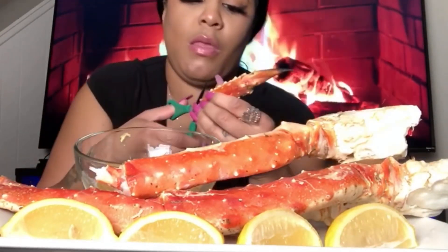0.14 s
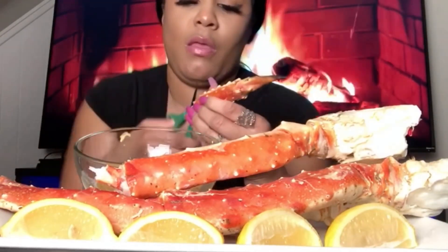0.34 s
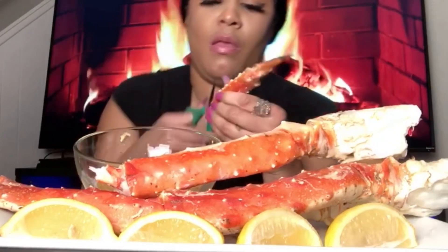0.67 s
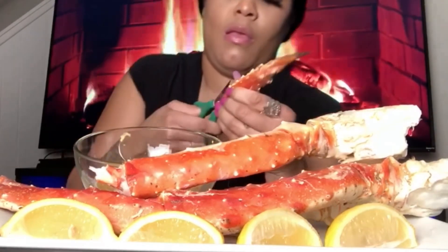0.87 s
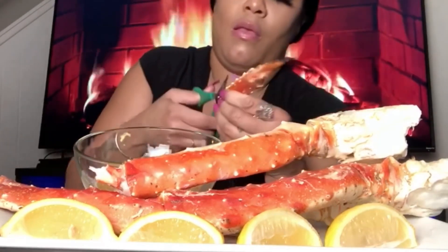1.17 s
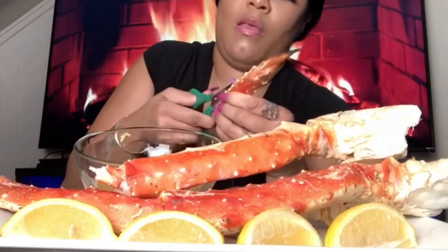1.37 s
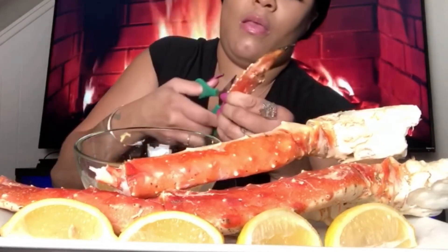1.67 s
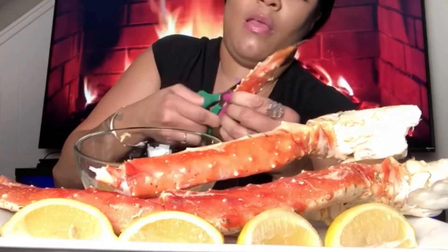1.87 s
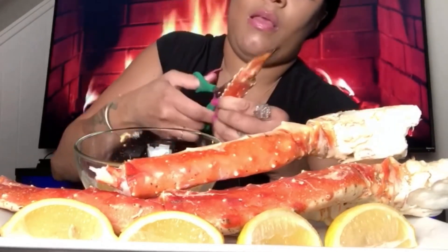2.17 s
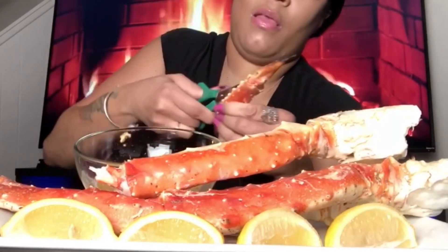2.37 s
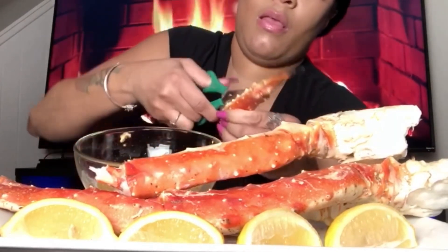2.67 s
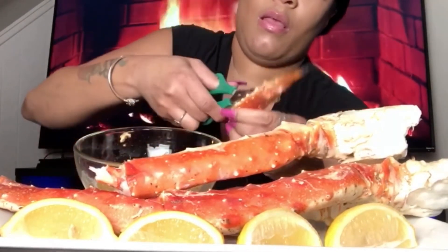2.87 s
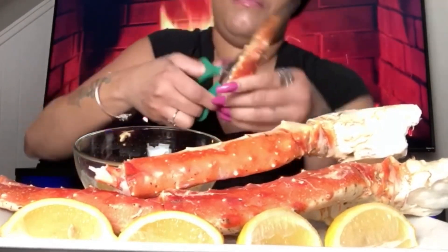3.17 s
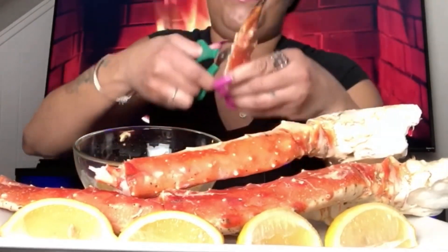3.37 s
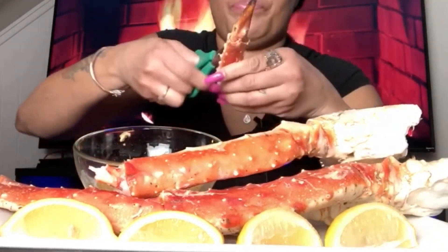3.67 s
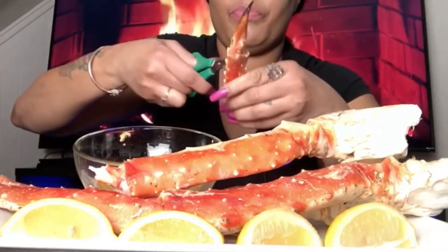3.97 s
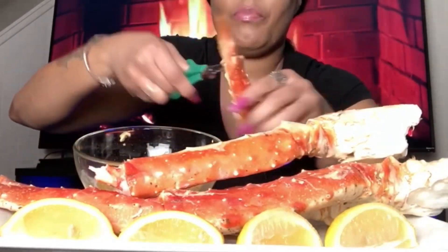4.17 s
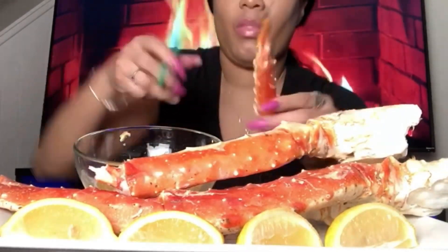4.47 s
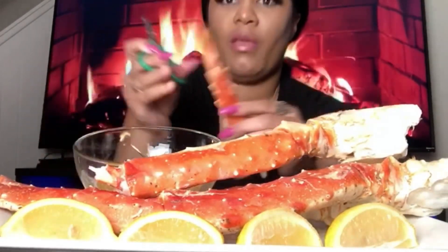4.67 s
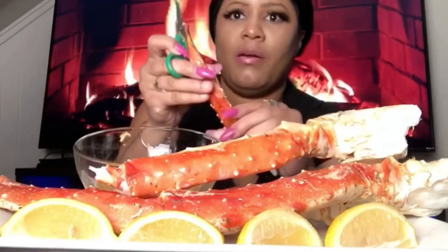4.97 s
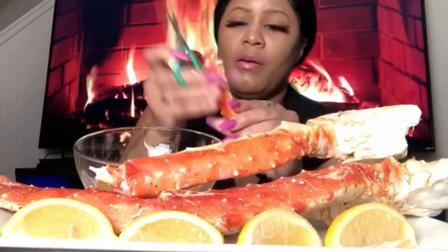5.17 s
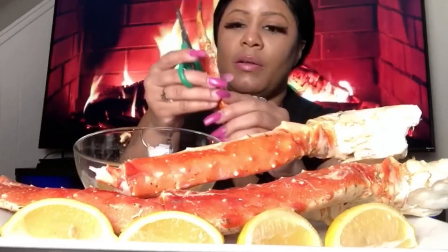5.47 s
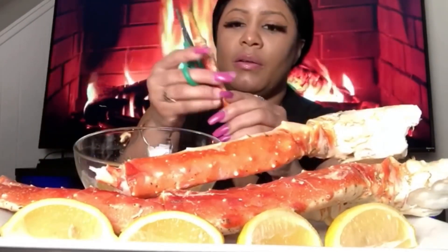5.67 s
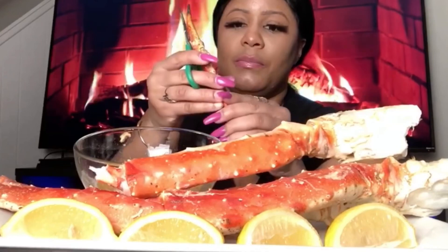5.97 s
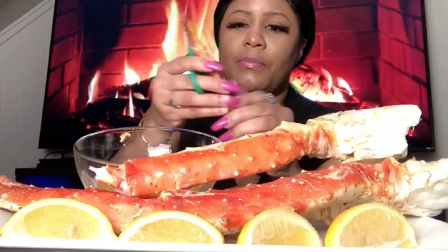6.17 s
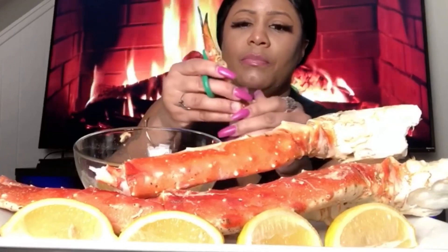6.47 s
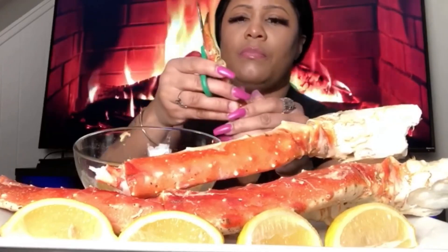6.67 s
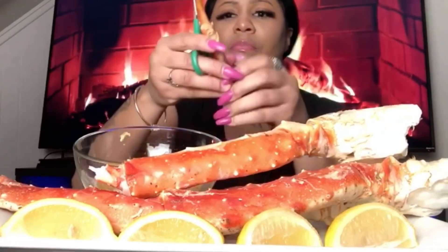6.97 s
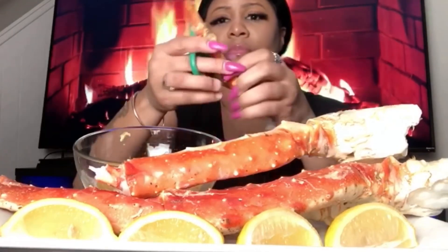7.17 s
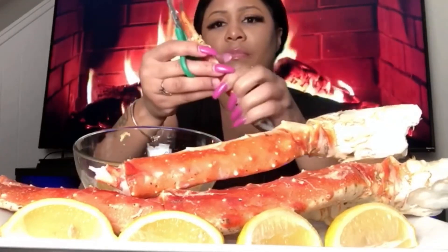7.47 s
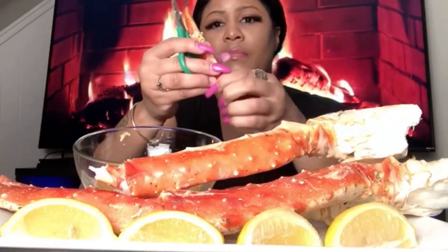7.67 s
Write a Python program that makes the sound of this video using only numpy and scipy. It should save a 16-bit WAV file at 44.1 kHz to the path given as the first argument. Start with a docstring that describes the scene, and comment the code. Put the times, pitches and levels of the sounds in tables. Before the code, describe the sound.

Close to the microphone, kitchen shears bite through a hard crab leg at a table. Brittle cracks come in quick clusters, with fine crackling splinters between, growing loudest around three to four seconds. After a near-quiet lull with soft bumps and a faint squeak, a few more sharp snaps follow. Small furnished room, short reflections, steady light hiss.

```python
"""Kitchen shears bite through a hard crab leg, close to the microphone, over a table in a small furnished room.
Each sharp crack is a noise burst ringing the shell wall and hollow leg, with a spray of treble splinters.
Short splintering runs are clumps of random snaps; echoes and a diffuse tail bring both back from the room.
Arms and elbows make decaying low bumps and dull scuffs on the table, and a narrow squeak comes and goes.
Underneath lie steady room and microphone hiss and, near the end, a wavering low hum."""
import sys
import numpy as np
from scipy import signal
from scipy.fft import rfft, irfft
from scipy.io import wavfile

SR = 44100
rng = np.random.default_rng(int(sys.argv[2]) if len(sys.argv) > 2 else 0)


def wav_record(signal):
    """Record a signal, one row per channel, as 16-bit PCM in the file named by sys.argv[1]."""
    frames = np.transpose(np.atleast_2d(signal))
    bounded = np.clip(frames, -1, 1)
    # unit amplitude maps onto the largest positive 16-bit level
    quanta = np.round(bounded * 32767).astype(np.int16)
    wavfile.write(sys.argv[1], SR, quanta)


N = 345600   # samples

# Shell cracks. Each row: start in seconds, relative strength in dB, then hollow body and
# splinter treble in dB relative to strength, before the common layer gains.
SHELL_CRACKS = [(0.4643, -5, -16, -4), (0.4913, -8.5, -29, -8), (.525, -8, -3, 2.5),
                (0.8422, -32.5, -22, 1.5), (0.8884, -20.5, -25, -4), (0.8962, -16, -31, -30),
                (0.9178, -21, -10, -6), (.939, -13.5, -10.5, -5.5), (1.1359, -26, -17, -16),
                (1.1424, -16.5, -10, -10.5), (1.2604, -30, -20, 2), (1.2877, -11, -11, -8),
                (1.308, -10, -7.5, -9), (1.3211, -11, -13, -17), (1.3293, -21, -6, -14),
                (1.3804, -8.5, -8, -6), (1.4019, -14.5, -25, -6.5), (1.5826, -28, -3, -5.5),
                (1.8114, -11.5, -17, -0.5), (1.8419, -14, 0.5, -4), (1.855, -13, -0.5, -2),
                (1.871, -14, -2, -4), (1.9044, -20, -24, -2.5), (1.922, -28, -16, 2), (2.0586, -27, 0, -5),
                (2.0703, -24, -1, -16), (2.0905, -20.5, -2, -20), (2.1133, -32, -7, -4),
                (2.2604, -22, -25, -12), (2.2705, -22, -9, 9.5), (2.275, -22, -5, 0), (2.2926, -19, 3, 5),
                (2.3009, -22, 3, 3), (2.3158, -17.5, 8, 3), (2.3411, -10.5, 1, -10.5),
                (2.4869, -25, -1, 5.5), (2.4997, -11.5, -7.5, -7), (2.643, -29, -19, 5),
                (2.6608, -28, -21, -2), (2.668, -22.5, -7, -10), (2.7021, -3, -14, 1),
                (2.7503, 1.5, -13.5, -2), (2.7665, -6, -17, -5), (2.7784, 3, -11, 1.5),
                (2.9699, -4.5, -19, -11.5), (3.0538, -22, -9, -15), (3.4065, -26, -17, -23),
                (3.4488, -20, -8, -17), (3.4539, -17.5, -22, -19), (3.484, -3.5, -9, -14.5),
                (3.5163, 3.5, -16, -7), (3.5392, -1, -1.5, -10.5), (3.7518, -26, -1.5, -4),
                (3.767, -21, -19, -14), (3.7781, -5.5, -30, -2.5), (3.845, -28, -20, -13),
                (3.8543, 5, -15, -15), (3.9806, -3, -14.5, -23), (4.0291, -7, -19, -6),
                (4.126, -4, -16.5, -6), (4.1549, -3, -8.5, -12.5), (4.184, -16.5, -6, -2.5),
                (4.2129, -12.5, -11, -2.5), (4.3264, -30.5, 0, -4), (4.7046, -34.5, 5, 5),
                (5.3113, -31.5, -9, -17), (6.0243, -21, -17, -30.5), (6.0829, -29.5, -6, -1.5),
                (6.2116, -3, -17, -27), (6.2166, -11, -7.5, -3.5), (6.2263, -20, -16, 2),
                (6.3316, -26.5, -7, -11), (6.438, -3.5, -9.5, 4.5), (6.4426, 0, -24, -16),
                (6.499, -10, -19, -2), (6.6633, -32.5, -13, 5.5), (6.926, -28.5, -7, -18),
                (6.9758, -15.5, -21, 2), (7.1968, -24.5, -25, -2)]
# The shell wall where it breaks, as the cut moves along the leg. Each row: time in seconds, pitch in Hz,
# ring width in Hz, typical tearing time in ms, finest treble in dB relative before its common gain.
WALL_ALONG_CUT = [(.46, 1850, 450, 0.59, 1), (.492, 2160, 300, 0.58, -4), (.9, 2200, 300, 0.76, -4.5),
                  (1.4, 2250, 249, 0.86, -5), (1.82, 2300, 350, 1.22, -7), (2.3, 2150, 400, .9, 0),
                  (2.5, 2330, 350, .9, -11.5), (2.76, 2260, 550, 0.58, -8), (3.0, 2330, 350, .9, -14),
                  (3.5, 2090, 483, 0.56, -2), (3.77, 2540, 550, 0.43, -5.5), (3.978, 2510, 550, 0.47, -32),
                  (4.03, 2580, 600, 1.17, -24), (4.15, 2530, 534, 0.36, -7), (6.201, 2440, 550, 0.8, -1.5),
                  (6.44, 2470, 550, 0.29, -4), (6.499, 2860, 604, 0.63, -8), (6.98, 2650, 500, 0.28, -38),
                  (7.2, 2330, 400, .3, -9)]
# Weaker modes of the wall. Each row: ratio to wall pitch, width in Hz, gain in dB.
WALL_SIDE_MODES = [(1.238, 380, -10.5), (0.71, 550, -16.5), (0.572, 250, -19.5)]
# Cavity of the leg. Each row: resonance in Hz, width in Hz, relative level in dB.
LEG_CAVITY = [(750, 99, 11), (1020, 78, 10), (1303, 260, 12.5)]
# Colour of the splinters in a crack. Each row: frequency in Hz, relative level in dB per Hz.
SPLINTER_SPECTRUM = [(1800, -31.5), (3000, -5.5), (4000, -9), (5000, -5.5), (6200, -5.5), (7400, 0.5),
                     (8200, -13.5), (9900, -2.5), (12000, -12), (15000, -8.5), (16800, -40)]
# Fine splintering while the blades press. Each row: start in seconds, length in seconds, level in dB,
# bass and treble outside the shell band in dB relative to that level.
SPLINTER_RUNS = [(0.454, 0.091, -44.5, 2.5), (0.672, 0.072, -55, 5.5), (0.832, 0.033, -61, 3),
                 (0.863, .16, -50, -1.5), (1.116, 0.058, -57, 2), (1.264, 0.07, -58, 4),
                 (1.573, .082, -55, -2.5), (1.79, 0.037, -59, 2), (1.829, 0.077, -38.5, 3),
                 (1.877, .09, -52, -7), (2.039, 0.099, -51.5, 1.5), (2.274, 0.1, -37, 2),
                 (2.473, 0.047, -39.5, -5.5), (2.633, 0.073, -50, -3.5), (2.74, .03, -43, 3),
                 (3.223, 0.077, -54.5, -8), (3.357, 0.041, -55.5, -3), (3.452, 0.084, -56, -3),
                 (3.497, 0.094, -37, -1), (3.742, 0.15, -58, 0.5), (3.845, 0.024, -33.5, -13),
                 (4.026, 0.02, -34.5, -4.5), (4.143, 0.031, -45, 3), (4.202, 0.071, -50, 3),
                 (4.303, 0.07, -53, -3), (4.784, 0.017, -62, -11.5), (4.875, 0.012, -53.5, -10),
                 (4.945, 0.048, -53, -6), (5.341, 0.02, -54, -14), (5.511, 0.056, -57, -21),
                 (5.767, 0.015, -56, -16), (6.003, 0.069, -55, -7), (6.206, 0.095, -47.5, 2),
                 (6.436, 0.055, -33.5, -6.5), (6.661, 0.032, -49.5, -2), (6.836, 0.13, -61, -6),
                 (6.967, 0.17, -57.5, -9), (7.11, .05, -63, -15), (7.206, 0.14, -58.5, -12)]
# Colour of the fine snaps. Each row: frequency in Hz, relative level in dB per Hz.
SNAP_SPECTRUM = [(290, -26), (500, -19.5), (969, -4.5), (1340, -21), (1850, -4.5), (2520, 1.5), (4220, -23),
                 (8550, -8.5), (15000, -30.5), (16100, -31), (16800, -113)]
# Echoes off table, bowl, chest and far wall. Each row: delay in seconds, level before dulling in dB, top in Hz.
EARLY_ECHOES = [(.0022, -4, 9800), (.005, -20, 10300), (0.011, -18, 6000), (0.026, -15, 3440)]
# Die-away of the room. Each row: frequency in Hz, time to fall 60 dB in seconds.
ROOM_DECAY = [(500, 0.26), (2500, 0.3), (7000, 0.2), (14000, 0.15)]
# Soft bumps through the table. Each row: start in seconds, nominal peak in dB, pitch in Hz.
TABLE_BUMPS = [(.185, -42.5, 228), (0.305, -40, 149), (0.327, -36.5, 124), (0.409, -41, 108),
               (1.593, -36.5, 51.7), (1.846, -41, 213), (2.009, -44, 574), (2.169, -44.5, 603),
               (3.335, -40, 483), (3.538, -36.5, 400), (4.795, -39.5, 126), (5.315, -43.5, 300),
               (5.348, -48, 101)]
# Arms and cloth scuffing the table. Each row: start in seconds, length in seconds, level in dB, top in Hz.
TABLE_SCUFFS = [(0.038, 0.61, -55, 1770), (0.183, 0.31, -50, 280), (0.4, 0.17, -49, 500),
                (1.59, 0.25, -44, 55), (1.68, 0.83, -54.5, 870), (3.24, .12, -57.5, 804),
                (3.5, 0.11, -51.5, 403), (3.752, 0.62, -61.5, 170), (4.774, 0.059, -50, 1830),
                (4.797, 0.22, -53.5, 218), (5.286, 0.14, -47, 1180), (6.95, 1, -60.5, 876)]
# Low hum swelling near the end. Each row: time in seconds, level in dB.
HUM_LEVEL = [(6.2, -88), (6.44, -67), (6.8, -64), (7.12, -66), (7.36, -58.5), (7.56, -62), (7.837, -64.5)]
# Colour of the room and microphone hiss. Each row: frequency in Hz, relative level in dB per Hz.
AIR_SPECTRUM = [(15, -32), (25, 15), (130, -2), (335, -1.5), (405, -3.5), (840, -6.5), (1480, -14.5),
                (2690, -13), (3820, -20), (7110, -20), (9840, -27.5), (13600, -30), (14800, -34),
                (16000, -55)]

SHELL_DB, HOLLOW_DB, SPLINTER_DB, FINEST_DB = -2.5, -2, 2, 8.5   # common gains of the crack layers
SHELL_BAND_HZ, FINEST_FROM_HZ = (1800, 3150), 7210
FINEST_FOLLOWS = 0.83   # share of the treble's swing in dB that the finest treble follows
PITCH_SPREAD, TEAR_SPREAD_DB = 0.015, 2   # crack to crack: share of pitch, dB of tearing time
SHARPER_PER_DB = 0.15   # dB of tearing time lost for each dB of strength: hard cracks are quick
ROOM_DB, ROOM_RESPONSES = -8.5, 6   # energy of the diffuse tail; number of room responses
BUMP_T60_S, BUMP_HZ, BUMP_SLOPE = 0.12, 120, 0.78   # ring time at this pitch; higher bumps die sooner
SQUEAK_S, SQUEAK_LENGTH_S, SQUEAK_DB, SQUEAK_HZ = 5.15, 0.28, -64, 1332
HUM_HZ, HUM_WIDTH_HZ = 52.2, 5.7   # width of each of two resonances in series
AIR_DB, AIR_CUT_HZ = -58.5, 85
BASS_CUT_HZ, CUTOFF_HZ = 46, 17200   # of the microphone


def cracks():
    """A fracture is a burst of tearing that rings the shell wall, the hollow of the leg and the splinters."""
    size = 2048
    t = np.arange(size) / SR
    noise = rng.standard_normal((len(SHELL_CRACKS), size + 2))
    body, splinters = np.zeros((2, N + size))
    along, *wall = np.transpose(WALL_ALONG_CUT)
    for (s, strength_db, hollow_db, treble_db), chance in zip(SHELL_CRACKS, noise):
        higher, longer, grit = chance[0], chance[1], chance[2:]
        hz, width_hz, tear_ms, finest_db = (np.interp(s, along, column) for column in wall)
        hz = hz * (1 + PITCH_SPREAD * higher)
        longer_db = TEAR_SPREAD_DB * longer - SHARPER_PER_DB * (strength_db + 12.0)
        life = t * 1000 / np.clip(tear_ms * amp(longer_db), 0.1, 12)

        # the split opens fast, then runs out; the treble burst lasts longer than the shell's burst
        tear = grit * np.minimum(life / 0.67, 1) * np.exp(-life)
        treble = grit * np.minimum(life / 0.38, 1) * np.exp(-life / 2.5)
        # one sharp click near the top of the burst, for an even treble
        treble[np.argmax(life > 0.7)] += 0.56 * np.sqrt(np.sum(treble ** 2))

        shell = resonance(resonance(tear, hz, width_hz), hz, 2560.0)
        for ratio, mode_width_hz, mode_db in WALL_SIDE_MODES:
            shell = shell - amp(mode_db) * resonance(tear, ratio * hz, mode_width_hz)
        hollow = np.zeros(size)
        for k, (cavity_hz, cavity_width_hz, cavity_db) in enumerate(LEG_CAVITY):
            ring = energy_one(resonance(tear, cavity_hz, cavity_width_hz))
            hollow += (-1) ** k * amp(cavity_db) * ring   # neighbours in opposite polarity
        coarse = energy_one(low(treble, FINEST_FROM_HZ, order=4))
        fine = energy_one(high(treble, FINEST_FROM_HZ, order=4))

        i = round(s * SR)
        strength = amp(strength_db)
        body[i:i + size] += strength * amp(SHELL_DB) * energy_one(shell)
        body[i:i + size] += strength * amp(HOLLOW_DB + hollow_db) * energy_one(hollow)
        fine_db = FINEST_DB + finest_db + FINEST_FOLLOWS * treble_db
        splinters[i:i + size] += strength * (amp(treble_db) * coarse + amp(fine_db) * fine)
    return (body + amp(SPLINTER_DB) * colour(splinters, SPLINTER_SPECTRUM))[:N]


def splintering(per_s=2200.0, spread_db=2.5):
    """Tiny fibres snap at random, in clumps; each run balances the shell band against the bass and treble."""
    sizes = amp(spread_db * np.minimum(rng.exponential(1, N), 5)) * rng.choice([-1, 1], N)
    born = rng.random(N) < per_s * amp(4.0 * drift(60.0)) / SR
    snaps = rms_one(colour(sizes * born, SNAP_SPECTRUM))
    bottom_hz, top_hz = SHELL_BAND_HZ
    wall = low(high(snaps, bottom_hz, order=4), top_hz, order=4)
    rest = low(snaps, bottom_hz, order=4) + high(snaps, top_hz, order=4)
    out = np.zeros(N)
    for s, length, run_db, broad_db in SPLINTER_RUNS:
        out += amp(run_db) * stroke(s, length) * (wall + amp(broad_db) * rest)
    return out


def room(x):
    """Short moments take turns through several random room responses, so the tail keeps an even colour."""
    turn = (np.arange(N) // 1500) % ROOM_RESPONSES
    return sum(signal.fftconvolve(x * (turn == k), reflections())[:N] for k in range(ROOM_RESPONSES))


def reflections():
    """A few smeared, dulled echoes, then a diffuse tail that dies band by band."""
    t = np.arange(SR // 2) / SR
    early = np.zeros(len(t))
    for delay, echo_db, top_hz in EARLY_ECHOES:
        after = np.maximum(t - delay, 0)
        # rough surfaces spread a late echo more
        smear = (t >= delay) * np.exp(-after / (0.17 * delay)) * rng.standard_normal(len(t))
        early += amp(echo_db) * low(energy_one(smear), top_hz)
    edges = 200 * 2 ** np.arange(0, 6.6, 0.5)   # half-octave bands in Hz
    tail = np.zeros(len(t))
    for bottom, top in zip(edges, edges[1:]):
        noise_band = band(rng.standard_normal(len(t)), bottom, top)
        tail += noise_band * amp(-60 * t / at_hz(ROOM_DECAY, np.sqrt(bottom * top)))
    tail *= 1 - np.exp(-t / 0.0023)   # builds up as reflections thicken
    tail *= amp(1.15 * drift(90.0)[:len(t)])   # furniture returns sound in lumps
    return early + amp(ROOM_DB) * energy_one(tail)


def bumps():
    """A soft push swells within a cycle and shakes the table top unevenly until the arm damps it."""
    out = np.zeros(N + SR)
    t = np.arange(SR // 2) / SR
    shake = rms_one(band(rng.standard_normal(N + SR), 60, 700))
    for s, peak_db, hz in TABLE_BUMPS:
        i = round(s * SR)
        t60 = max(BUMP_T60_S * (BUMP_HZ / hz) ** BUMP_SLOPE, 0.02)
        swell = amp(peak_db - 60 * (t / t60) ** 1.32) * np.minimum(t * hz / 0.74, 1)
        out[i:i + len(t)] += swell * (np.sin(2 * np.pi * hz * t) + 0.17 * shake[i:i + len(t)])
    return out[:N]


def rustle():
    """Skin and cloth sliding on the table make dull, lumpy noise."""
    noise = amp(2.7 * drift(19.0)) * rng.standard_normal(N)
    out = np.zeros(N)
    for s, length, level_db, top_hz in TABLE_SCUFFS:
        out += amp(level_db) * stroke(s, length) * rms_one(low(noise, top_hz, order=3))
    return out


def squeak():
    """A faint, narrow noisy tone, two resonances in series, that comes and goes unevenly."""
    t = np.arange(N) / SR - SQUEAK_S
    tone = resonance(resonance(rng.standard_normal(N), SQUEAK_HZ, 90.0), SQUEAK_HZ, 110.0)
    sounding = (t > 0) * (t < SQUEAK_LENGTH_S)
    return amp(SQUEAK_DB + 4.6 * drift(40.0)) * rms_one(tone) * sounding


def hum():
    """Noise through two narrow resonances makes a wavering low tone, fading in."""
    noise = rng.standard_normal(N + SR)
    tone = resonance(resonance(noise, HUM_HZ, HUM_WIDTH_HZ), HUM_HZ, HUM_WIDTH_HZ)[SR:]
    fade = np.clip((np.arange(N) / SR - HUM_LEVEL[0][0]) / 0.2, 0, 1)
    return fade * amp(in_time(HUM_LEVEL)) * rms_one(tone)


def air():
    """Steady room and microphone hiss, coloured noise thin in the deepest bass."""
    hiss = high(colour(rng.standard_normal(N + 4096), AIR_SPECTRUM), AIR_CUT_HZ)[4096:]
    return amp(AIR_DB + 0.5 * drift(36.0)) * rms_one(hiss)


def resonance(x, hz, width_hz):
    """Two-pole peak of gain near 1."""
    r = np.exp(-np.pi * width_hz / SR)
    zeros = np.array([1, 0, -1]) * (1 - r * r) / 2
    poles = [1, -2 * r * np.cos(2 * np.pi * hz / SR), r * r]
    return signal.lfilter(zeros, poles, x)


def colour(x, spectrum):
    """Causal filter with the given spectrum (minimum phase from the folded cepstrum)."""
    size = 4096
    hz = np.arange(size // 2 + 1) * SR / size
    cepstrum = irfft(at_hz(spectrum, hz) * np.log(10) / 20)
    cepstrum[1:size // 2] *= 2
    cepstrum[size // 2 + 1:] = 0
    return signal.oaconvolve(x, irfft(np.exp(rfft(cepstrum))))[:len(x)]


def drift(rate_hz):
    """Slow chance of spread 1: low-passed noise, drawn at every 40th sample and joined by lines."""
    r = np.exp(-2 * np.pi * rate_hz * 40 / SR)
    slow = signal.lfilter([1], [1, -2 * r, r * r], rng.standard_normal(N // 40 + 2002))[2000:]
    return np.interp(np.arange(N) / 40, np.arange(len(slow)), rms_one(slow))


def stroke(s, length):
    """A gesture that starts quickly, peaks and tapers off."""
    t = np.arange(N) / SR - s
    return np.clip(np.minimum(t / (0.16 * length), (length - t) / (0.8 * length)), 0, 1)


def low(x, hz, order=2):
    """Butterworth low-pass."""
    return signal.sosfilt(signal.butter(order, min(hz, 0.45 * SR), fs=SR, output="sos"), x)


def high(x, hz, order=2):
    """Butterworth high-pass."""
    return signal.sosfilt(signal.butter(order, hz, "high", fs=SR, output="sos"), x)


def band(x, bottom_hz, top_hz):
    """Butterworth band-pass."""
    return signal.sosfilt(signal.butter(2, [bottom_hz, top_hz], "band", fs=SR, output="sos"), x)


def amp(db):
    """Gain of a level in dB."""
    return 10 ** (np.asarray(db) / 20)


def rms_one(x):
    """Scaled to rms 1."""
    return x / np.sqrt(np.mean(x ** 2) + 1e-20)


def energy_one(x):
    """Scaled to a summed square of 1."""
    return x / np.sqrt(np.sum(x ** 2) + 1e-20)


def in_time(rows):
    """A (s, value) curve at every sample."""
    return np.interp(np.arange(N) / SR, *np.transpose(rows))


def at_hz(points, hz):
    """A (Hz, value) table read on a log axis."""
    f, v = np.transpose(points)
    return np.interp(np.log(np.maximum(hz, 1)), np.log(f), v)


def scene():
    """Leg and shears close by with the room's answer, then the table sounds and the background."""
    leg = cracks() + splintering()
    table = bumps() + rustle()
    return (leg + room(leg) + table + squeak() + hum() + air())[None]


def record(dry):
    """The microphone loses the deepest bass; the top is cut steeply."""
    steep_cut = signal.cheby2(12, 70, CUTOFF_HZ, fs=SR, output="sos")
    return signal.sosfilt(steep_cut, high(dry, BASS_CUT_HZ))


dry = scene()
out = record(dry)
wav_record(out)
```